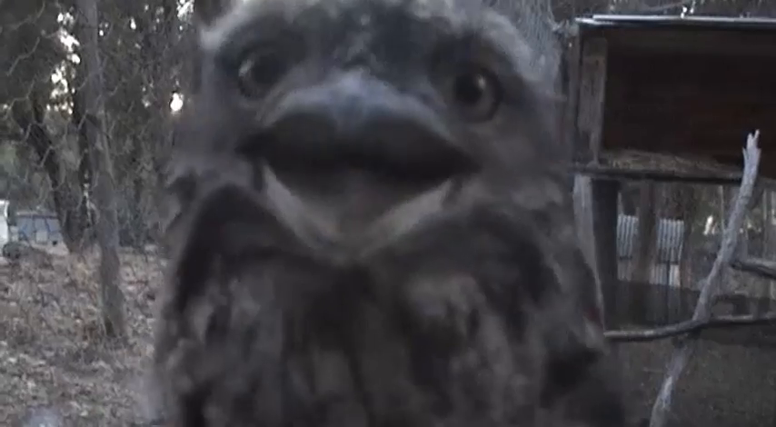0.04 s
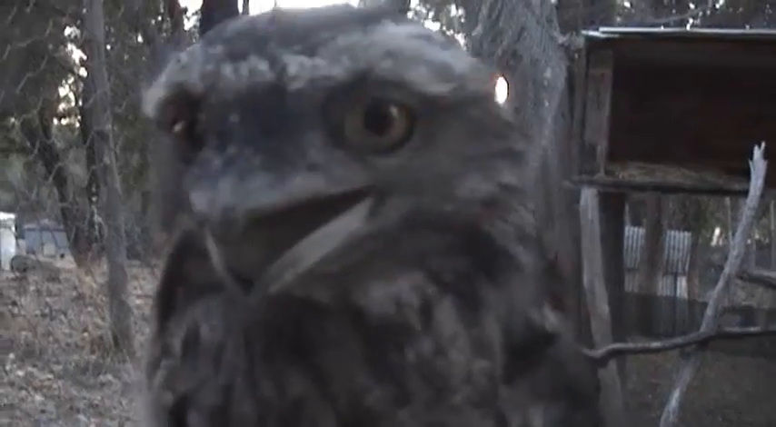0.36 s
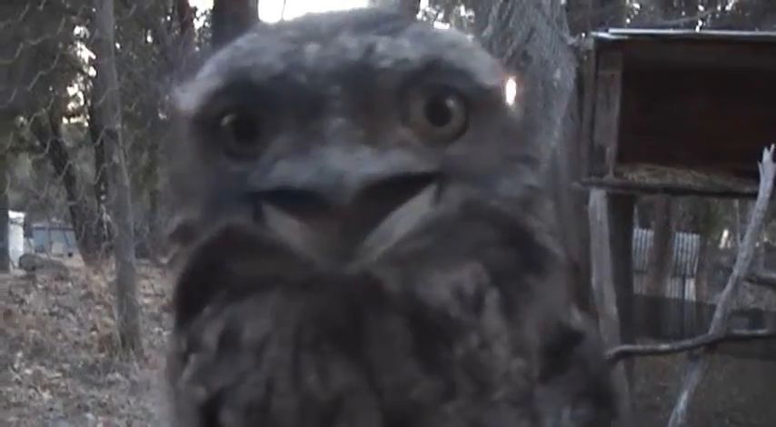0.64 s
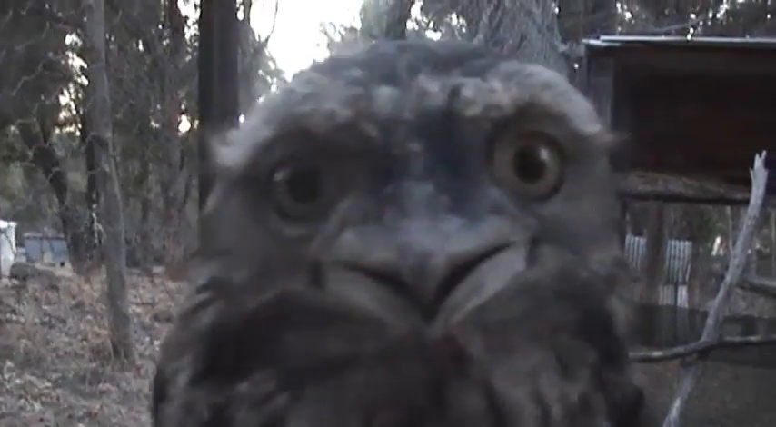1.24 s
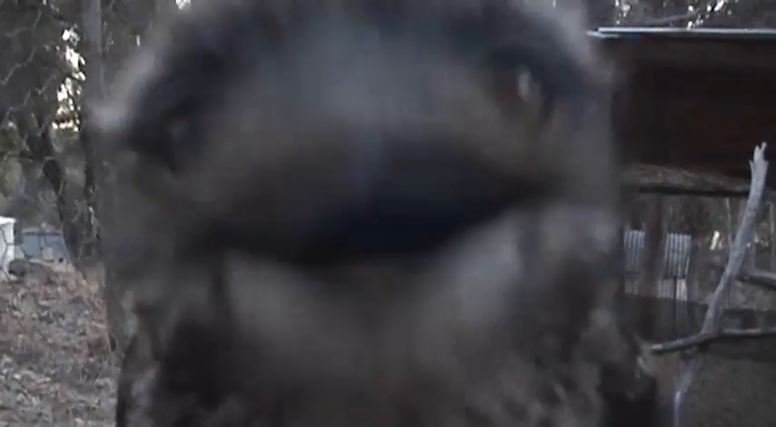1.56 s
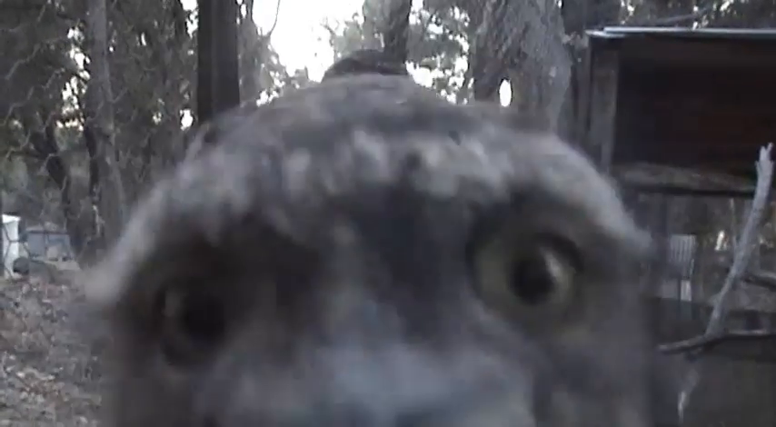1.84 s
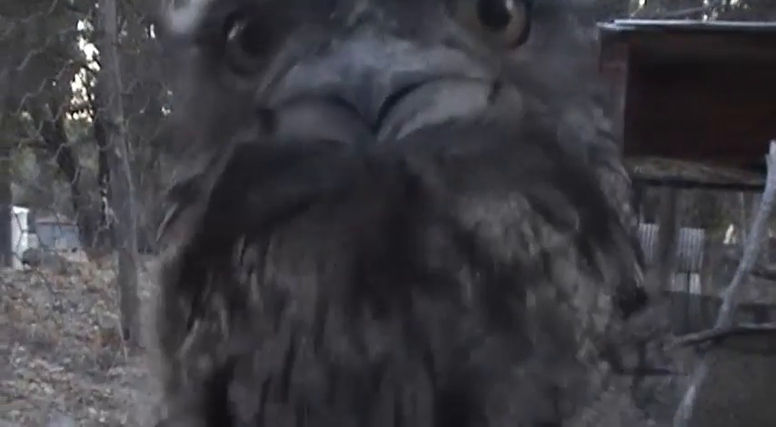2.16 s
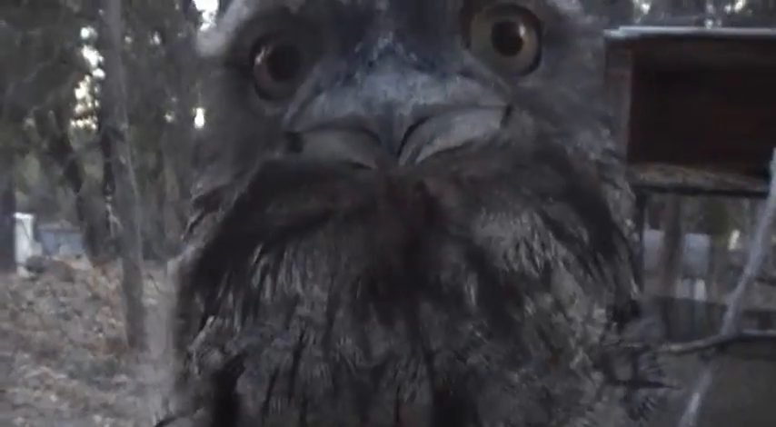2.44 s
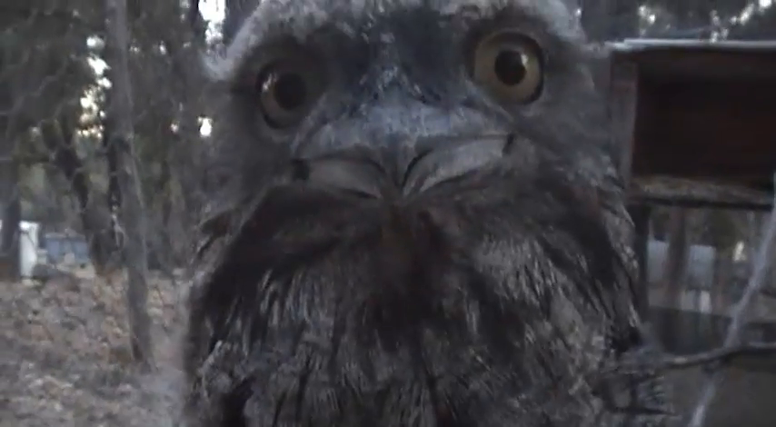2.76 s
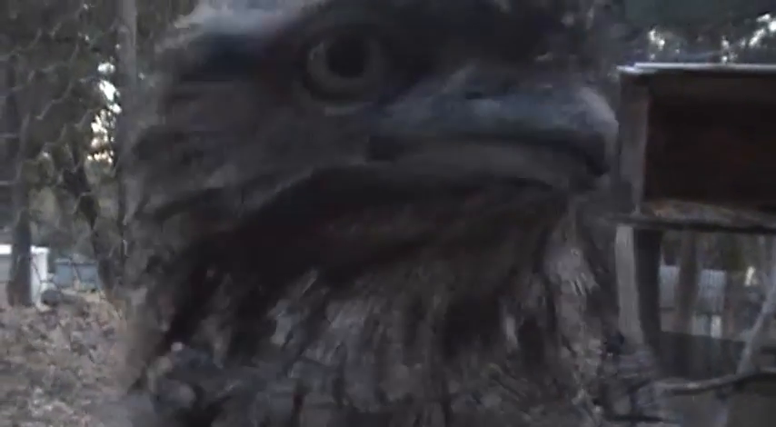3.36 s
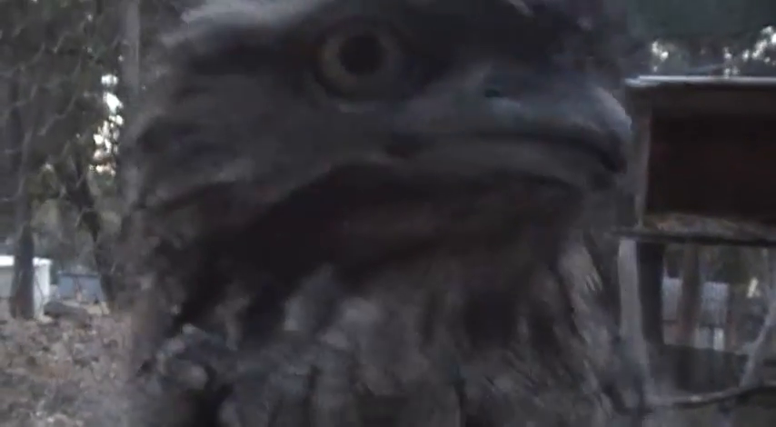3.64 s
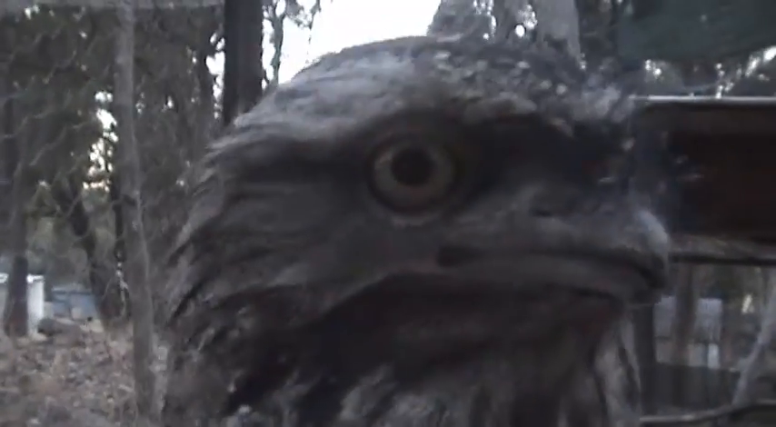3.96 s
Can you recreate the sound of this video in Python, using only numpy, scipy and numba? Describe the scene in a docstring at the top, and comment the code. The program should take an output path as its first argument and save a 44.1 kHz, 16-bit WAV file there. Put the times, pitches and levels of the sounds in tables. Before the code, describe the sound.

A young bird gives two harsh, raspy begging calls close by, over quiet outdoor hiss.

```python
"""Over a quiet outdoor hiss, with light air buffeting the microphone, a young frogmouth begs close by.
First comes a wide-beaked rasp that clears into a falling whine, as membrane claps excite the
resonances of windpipe and throat. A faint distant whine follows; then the bird's head brushes past,
with feather rustle and a few dry taps. Last, after more faint whines, a growl breaks into a
stuttering squawk through a narrower beak, with thin squeaks near its end."""
import sys
import numpy as np
from scipy import signal
from scipy.fft import rfft, irfft
from scipy.io import wavfile
from scipy.ndimage import uniform_filter1d
from numba import njit

SR = 44100
rng = np.random.default_rng(int(sys.argv[2]) if len(sys.argv) > 2 else 0)


def to_wav(sig):
    """Store sig (one row per channel, or 1-D mono) as 16-bit WAV at the path in sys.argv[1].

    Samples outside -1..1 are clipped; the rate is SR.
    """
    pcm = np.clip(np.atleast_2d(sig), -1, 1) * 32767
    pcm = np.round(pcm).astype(np.int16)
    wavfile.write(sys.argv[1], SR, pcm.T)  # frames by channels


N = 176400


def undb(db):
    """Amplitude ratio of a level in decibels."""
    return 10 ** (np.asarray(db) / 20)


def unit(x):
    """Normalisation to an rms of 1."""
    return x / (np.std(x) + 1e-12)


def curve(rows, t, column=1):
    """Linear interpolation of one table column over time."""
    rows = np.array(rows, float)
    return np.interp(t, rows[:, 0], rows[:, column])


def envelope(rows):
    """Amplitude envelope of a level curve, decaying exponentially beyond its ends."""
    t = np.arange(N) / SR
    outside_s = np.maximum(rows[0][0] - t, 0) + np.maximum(t - rows[-1][0], 0)
    return undb(curve(rows, t)) * np.exp(-outside_s / 0.024)


def steady(x):
    """Division by the short-term rms, so that an envelope alone sets the level."""
    power = uniform_filter1d(uniform_filter1d(x * x, size=600), size=600)
    return x / np.sqrt(np.maximum(power, 0) + 1e-4 * np.mean(x * x))


def drift(samples):
    """Slow random fluctuation: white noise under a moving average."""
    return unit(uniform_filter1d(rng.standard_normal(N), size=samples))


def colour(x, points, size=4096):
    """Minimum-phase filtering by a response given as (frequency_hz, gain_db) points."""
    points = np.array(points, float)
    hz = np.fft.rfftfreq(size, 1 / SR)
    gain_db = np.interp(np.log(hz + 1), np.log(points[:, 0]), points[:, 1])
    cepstrum = irfft(np.log(undb(gain_db)))
    cepstrum[1:size // 2] *= 2  # folding onto positive time makes the filter causal
    cepstrum[size // 2 + 1:] = 0
    impulse_response = irfft(np.exp(rfft(cepstrum)))[:size // 2]
    return signal.fftconvolve(x, impulse_response)[:N]


@njit
def resonance(x, hz, width_hz):
    """Second-order resonator with unit gain at its moving centre frequency."""
    y, band, low = np.empty(len(x)), 0., 0.
    for i in range(len(x)):
        g, damping = np.tan(np.pi * hz[i] / SR), width_hz / hz[i]
        v = (band + g * (x[i] - low)) / (1 + g * (g + damping))
        band, low = 2 * v - band, low + 2 * g * v
        y[i] = damping * v
    return y


def wide_noise(points, side_db):
    """Partly coherent stereo noise: a common signal plus one in antiphase."""
    mid, side = (unit(colour(rng.standard_normal(N), points)) for _ in range(2))
    return mid + undb(side_db) * side * np.array([[1], [-1]])


def hiss():
    """Stationary broadband noise forms the outdoor background."""
    # spectrum of the hiss: frequency_hz, gain_db
    hiss_spectrum = [(25, -17.5), (100, -13), (250, -2.5), (700, -0.5), (2400, -6.5), (5500, -6.5),
                     (9200, -10.5), (11500, -20.5)]
    return undb(-46) * wide_noise(hiss_spectrum, side_db=-11)


def breeze():
    """Pressure fluctuations of air on the microphone give a low rumble and single puffs."""
    # spectrum of the rumble: frequency_hz, gain_db
    rumble_spectrum = [(20, -11), (50, -3), (90, 5.5), (220, -7), (350, -21), (700, -43)]
    # strength of the rumble: time_s, level_db
    rumble_levels = [(0, -38.5), (.3, -42), (.56, -48.5), (.76, -43.5), (1.03, -45.5), (1.08, -67.5),
                     (1.33, -47), (1.65, -53.5), (2.05, -64.5), (2.17, -45.5), (2.55, -55.5), (2.9, -51),
                     (3.06, -69.5), (3.68, -53), (3.84, -65), (3.95, -37)]
    # puffs of air: centre_s, level_db
    puffs = [(.283, -29), (0.336, -27), (0.486, -28), (.613, -38), (0.756, -27), (0.851, -30), (.903, -32),
             (0.916, -21), (0.943, -27.5), (0.975, -26.5), (1.027, -26.5), (1.493, -30.5), (2.171, -31),
             (2.319, -30.5), (2.407, -34), (2.894, -36), (3.964, -37.5)]
    puff_hz, half_width_cycles = 129, 0.76
    t = np.arange(N) / SR
    pan = undb([[-1.5], [1.5]])
    out = wide_noise(rumble_spectrum, side_db=-6) * envelope(rumble_levels) * pan
    for centre_s, level_db in puffs:
        cycles = (t - centre_s) * puff_hz * np.exp(rng.normal(0, 0.06))
        phase = 2 * np.pi * cycles + rng.normal(0, 1.0, (2, 1))
        swing = np.cos(phase) + undb(-8) * np.sin(2 * phase)
        out += undb(level_db) * swing * np.exp(-(cycles / half_width_cycles) ** 2)
    return out


def whines():
    """Turbulence filtered by a narrow gliding resonance sounds as thin, airy notes."""
    # whines (the first distant) and squeaks: start_s, length_s, first_hz, last_hz, level_db
    notes = [(0.493, 0.42, 2000, 1550, -51.5), (3.13, 0.14, 1303, 1164, -50), (3.105, 0.065, 217, 266, -46),
             (3.517, .045, 6460, 6400, -45.5), (3.693, 0.12, 6270, 6500, -46),
             (3.738, 0.054, 1306, 507, -39.5)]
    t, out = np.arange(N) / SR, np.zeros(N)
    for start_s, length_s, first_hz, last_hz, level_db in notes:
        progress = np.clip((t - start_s) / length_s, 0, 1)
        hz = first_hz + (last_hz - first_hz) * progress
        width_hz = 91 * np.sqrt(first_hz / 1000)
        tone = resonance(resonance(rng.standard_normal(N), hz, width_hz), hz, width_hz)
        out += steady(tone) * np.sin(np.pi * progress) * undb(level_db)
    return out


def rustle():
    """Friction of passing feathers makes shot noise, a dense scatter of tiny scrapes."""
    # spectrum of a scrape: frequency_hz, gain_db
    scrape_spectrum = [(400, -28), (1120, 5.5), (2600, -6), (6000, -10), (9200, -4), (11500, -13)]
    # strength of the rustle: time_s, level_db
    rustle_levels = [(1.62, -80), (1.71, -39.5), (1.8, -64)]
    scrapes_per_s = 2500
    scrapes = rng.standard_normal(N) * (rng.random(N) < scrapes_per_s / SR)
    return unit(colour(scrapes, scrape_spectrum)) * envelope(rustle_levels)


def taps():
    """Heavily damped oscillations: clicks of about one cycle, each with a scratchy tail."""
    # dry taps: start_s, level_db, ring_hz
    impacts = [(1.648, -30, 2300), (1.69, -27, 2400), (1.7566, -20, 1900), (1.7607, -24.5, 2800),
               (1.7717, -15, 3200), (1.7753, -19.5, 3600), (1.785, -31, 2000), (1.8011, -24, 1500),
               (1.861, -31.5, 2600)]
    decay_cycles, tail_decay_s = 0.99, 0.0012
    out, t = np.zeros(N), np.arange(1024) / SR
    for start_s, level_db, ring_hz in impacts:
        click = np.sin(2 * np.pi * ring_hz * t) * np.exp(-t * ring_hz / decay_cycles)
        band = signal.butter(1, [ring_hz / 2, min(ring_hz * 2, SR / 3)], "band", fs=SR)
        scratch = unit(signal.lfilter(*band, rng.standard_normal(len(t))))
        tail = undb(-12.5) * scratch * np.exp(-t / tail_decay_s)
        i = int(start_s * SR)
        out[i:i + len(t)] += undb(level_db) * (click / click.max() + tail)
    return out


def membrane(pitch_hz, roughness, halving):
    """A pulse train of membrane claps with jitter and shimmer; air rushes after each clap."""
    jitter_periods, shimmer_db, rush_decay_s = 0.11, 2.5, 0.0006
    cycles = np.cumsum(pitch_hz) / SR
    at = np.flatnonzero(np.diff(np.floor(cycles)))
    timing, size = rng.standard_normal((len(at), 2)).T
    jitter = jitter_periods * roughness[at] * timing * SR / pitch_hz[at]
    slip = signal.lfilter([1], [1, -.97], jitter)  # timing errors carry over to later claps
    position = np.interp(np.round(cycles[at]), cycles, np.arange(N)) + slip
    weakening = halving[at] * (np.arange(len(at)) % 2)  # period doubling: the octave below
    strength = undb(shimmer_db * roughness[at] * np.clip(size, -2, 2)) * (1 - weakening)
    # a windowed sinc places each clap between samples
    samples = np.floor(position).astype(int)[:, None] + np.arange(-7, 9)
    offset = samples - position[:, None]
    pulses = strength[:, None] * np.sinc(offset) * np.sinc(offset / 8)
    claps = unit(np.bincount(np.clip(samples, 0, N).ravel(), pulses.ravel(), N + 1)[:N])
    air_power = signal.lfilter([1], [1, -np.exp(-1 / (rush_decay_s * SR))], claps ** 2)
    air = unit(np.sqrt(air_power) * rng.standard_normal(N))
    return claps + air * (undb(-25) + undb(-4) * roughness)


def growl():
    """Slow, strongly aperiodic claps excite a low resonance early in the second call."""
    # low resonance: frequency_hz, gain_db
    growl_spectrum = [(130, -43), (250, -9), (350, -3), (440, -0.5), (700, -8.5), (1100, -9), (1500, -19),
                      (6000, -52)]
    # strength of the growl: time_s, level_db
    growl_levels = [(3.335, -46.5), (3.36, -34), (3.412, -27), (3.48, -30), (3.51, -37), (3.67, -47)]
    source = membrane(pitch_hz=np.full(N, 363.7), roughness=np.full(N, 1.1), halving=np.zeros(N))
    return steady(colour(source, growl_spectrum)) * envelope(growl_levels)


def call(voice, levels):
    """Source and filter: claps, choked in quick stutters, excite windpipe and throat as the beak moves."""
    # weakening of every second clap: time_s, share
    halving = [(.066, 1), (.085, 0.77), (.215, 0)]
    # depth of the choking: time_s, share
    stutter_depth = [(.07, 0.4), (.2, 0.34), (3.45, 0.44), (3.53, 0.5), (3.575, 1), (3.66, 0.8), (3.678, 0)]
    # sharp resonance of the windpipe: time_s, centre_hz
    windpipe = [(.03, 1750), (.3, 1370), (3.33, 1380), (3.465, 1980), (3.525, 1540), (3.66, 1720),
                (3.71, 1350)]
    # beak position, from 0 (shut) to 3 (wide): time_s, opening
    beak = [(0, 3.05), (.11, 2.25), (.3, 1.43), (3.28, 0.95), (3.66, 1.056), (3.7, 0.88), (3.725, 0.24)]
    # throat response at openings 0, 1, 2 and 3: frequency_hz, gain_db
    shut = [(200, -56), (450, -26), (750, -26), (1100, -9.5), (1600, -6.5), (1900, -8), (2130, 9.5),
            (2400, -16), (2900, -29), (5500, -44)]
    narrow = [(200, -31), (400, -8.5), (900, -23), (1250, -5), (1620, -1), (2000, -1), (2350, 2),
              (2900, -14), (3600, -14), (4700, -38.5), (9200, -36.5), (11500, -45)]
    half = [(80, -27), (400, -5), (700, -13), (1020, -24.5), (1500, -8), (2100, 1), (2600, -5), (3700, 0.5),
            (4600, -7), (5600, -20), (8000, -46), (9050, -12.5), (10300, -61)]
    wide = [(200, -27), (400, -10), (700, -21.5), (1300, -24.5), (1650, -16.5), (2080, -7.5), (2550, -14.5),
            (3600, -1.5), (4500, -9.5), (5400, -21), (6900, -22.5), (8300, -49), (9400, -18.5),
            (10600, -46)]
    t = np.arange(N) / SR
    roughness = curve(voice, t, column=2)
    waver = np.exp(0.036 * np.sqrt(roughness) * drift(samples=400))
    source = membrane(curve(voice, t) * waver, roughness, curve(halving, t))
    stutter_hz = 137.9 * np.exp(0.2 * drift(samples=300))
    closure = np.clip(2 * np.sin(2 * np.pi * np.cumsum(stutter_hz) / SR), 0, 1)
    choked = source * (1 - curve(stutter_depth, t) * closure)
    piped = choked + resonance(choked, curve(windpipe, t), width_hz=136.0)
    opening, radiated = curve(beak, t), np.zeros(N)
    for step, throat in enumerate([shut, narrow, half, wide]):
        share = np.maximum(1 - abs(opening - step), 0)
        radiated += colour(piped * share, throat)
    return steady(radiated) * envelope(levels)


def rasp():
    """First call: rough, period-doubled vibration turns regular and falls in pitch."""
    # membrane vibration: time_s, pitch_hz, roughness
    rasp_voice = [(0, 749, 0.34), (.066, 771.4, 0.61), (.085, 818.5, 0.96), (.2, 708.5, 0.62),
                  (.22, 697, 0.3), (.25, 695, 0.26), (.27, 674.6, 0.12), (.3, 647, .05), (.335, 567, 0.2)]
    # strength of the rasp: time_s, level_db
    rasp_levels = [(0, -14.5), (.07, -19), (.096, -19), (.105, -24.5), (.15, -19.5), (.179, -27.5),
                   (.19, -20.5), (.21, -30), (.228, -22.5), (.26, -30.5), (.295, -31), (.31, -43),
                   (.34, -59)]
    return call(rasp_voice, rasp_levels)


def squawk():
    """Second call: rough vibration rises and falls in pitch under deep amplitude modulation."""
    # membrane vibration: time_s, pitch_hz, roughness
    squawk_voice = [(3.28, 624, 0.023), (3.33, 690, 0.12), (3.365, 793.7, 0.89), (3.465, 964.3, 0.82),
                    (3.53, 836.7, 0.99), (3.575, 812, 0.57), (3.66, 789, 0.39), (3.678, 736, 0.15),
                    (3.706, 668.7, 0.46), (3.728, 696, 0.93), (3.75, 530.5, 0.3), (3.8, 527, 1)]
    # strength of the squawk: time_s, level_db
    squawk_levels = [(3.28, -59), (3.34, -39), (3.37, -35), (3.432, -38), (3.439, -24), (3.468, -18.5),
                     (3.52, -22.5), (3.58, -25), (3.662, -22.5), (3.667, -49), (3.674, -40), (3.682, -23.5),
                     (3.705, -26.5), (3.718, -31.5), (3.76, -26), (3.79, -37), (3.86, -44), (3.93, -49)]
    return call(squawk_voice, squawk_levels)


def scene():
    """Superposition of the nearby bird and a faint distant whine, with moving air and hiss."""
    centred = rasp() + squawk() + growl() + whines() + rustle() + taps()
    return centred + breeze() + hiss()


def record(dry):
    """Two microphone ports of unequal response, soft saturation of peaks and a steep low-pass."""
    # extra brightness of the left port: frequency_hz, left_minus_right_db
    imbalance = [(1750, 0.67), (2300, 2.5), (4100, 3), (6500, 0)]
    ceiling, cutoff_hz = 0.88, 11750
    left = colour(dry[0], [(hz, db / 2) for hz, db in imbalance])
    right = colour(dry[1], [(hz, -db / 2) for hz, db in imbalance])
    ports = np.array([left, right])
    rounded = ports / (1 + (ports / ceiling) ** 10) ** (1 / 10)
    return signal.sosfilt(signal.ellip(10, .2, 80, cutoff_hz, fs=SR, output="sos"), rounded)


dry = scene()
out = record(dry)
to_wav(out)
```